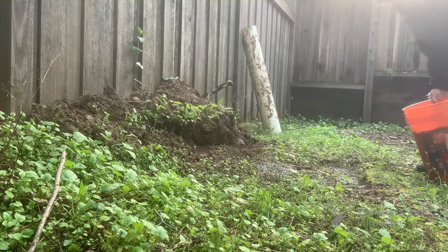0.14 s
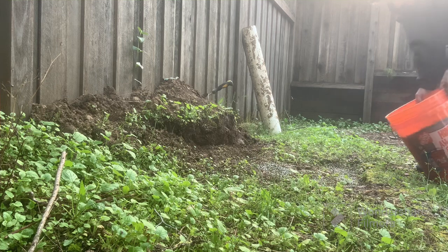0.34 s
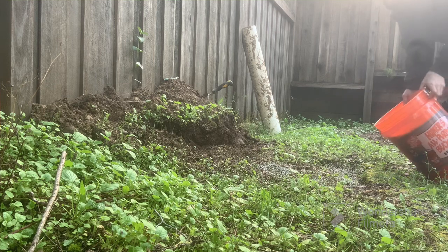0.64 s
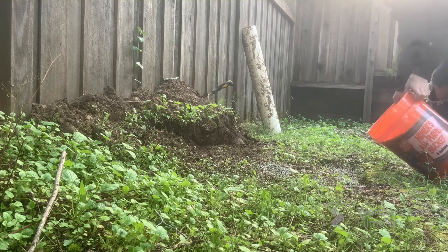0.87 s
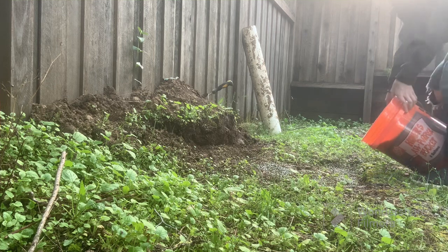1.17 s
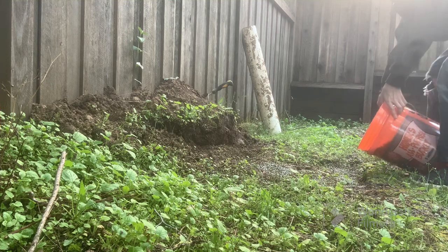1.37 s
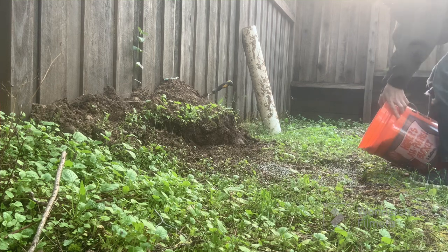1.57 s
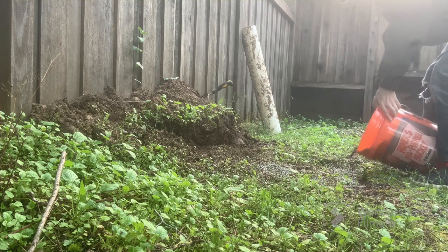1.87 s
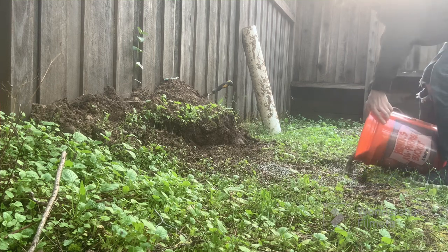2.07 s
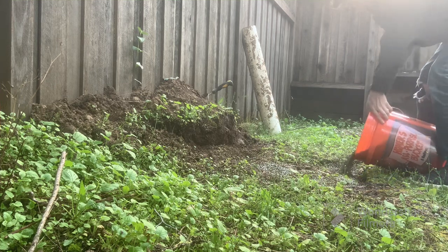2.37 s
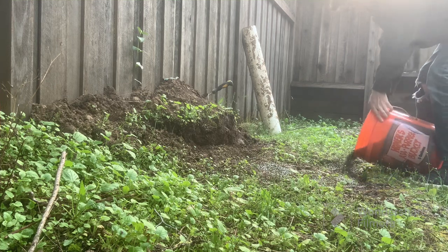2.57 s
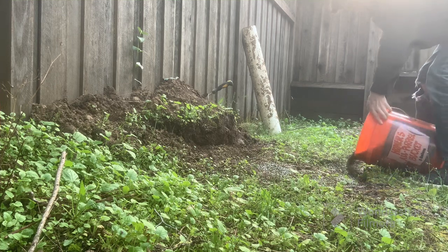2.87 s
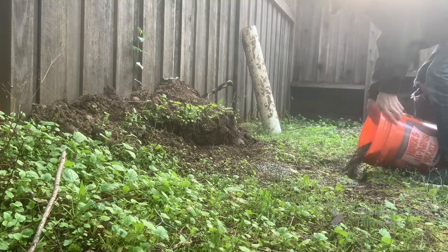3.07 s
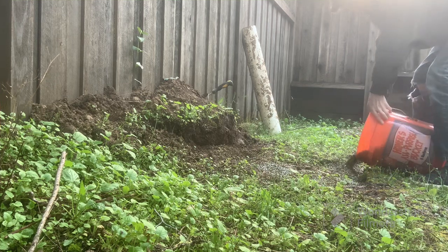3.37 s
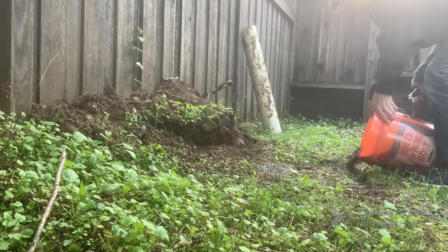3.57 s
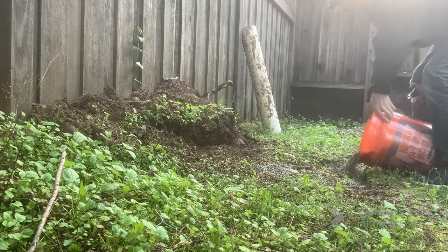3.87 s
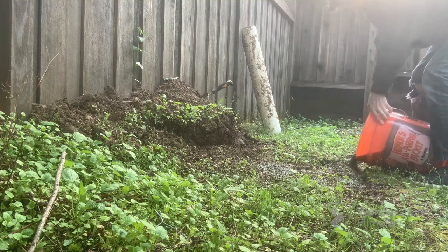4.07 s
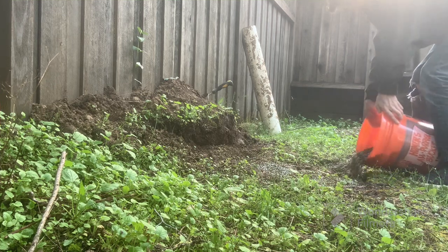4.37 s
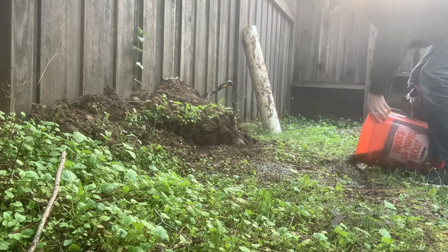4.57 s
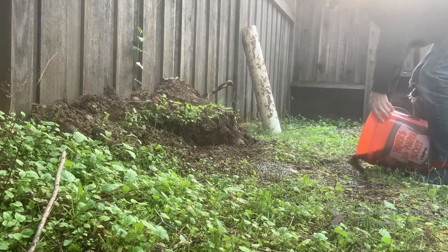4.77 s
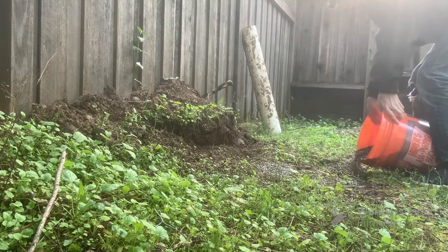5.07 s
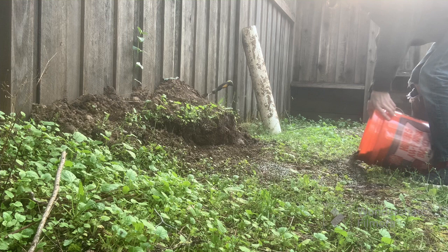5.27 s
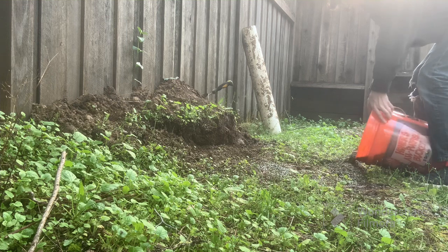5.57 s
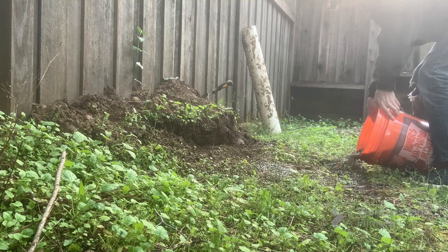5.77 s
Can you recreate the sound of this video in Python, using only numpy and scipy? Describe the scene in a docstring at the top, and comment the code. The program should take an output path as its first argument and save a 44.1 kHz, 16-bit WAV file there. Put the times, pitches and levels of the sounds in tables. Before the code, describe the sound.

Gravel pours from a plastic bucket onto damp soil, heard close and to the right. Dense clacking stones come first, then duller rattles, gritty hiss and scattered ticks as the bucket is shaken out. Low thuds knock the ground, the flow briefly thins, and one last rattling surge fades. A soft machine hum and rumble lie far behind.

```python
"""Gravel slides out of a tipped plastic bucket onto soil in a fenced yard, to the right of a two-port microphone.
Random impacts drum on the bucket wall's resonances, ring the stones and hiss as fine grit on the heap.
Single stones clack and pebbles tick as short struck rings; the bucket thuds on the ground in falling low cycles.
Behind it, shaped noise makes a distant machine's wavering hum, a rumble and low ground swells around the thuds."""
import sys
import numpy as np
from scipy import signal
from scipy.fft import rfft, irfft, next_fast_len
from scipy.io import wavfile

SR = 44100
rng = np.random.default_rng(int(sys.argv[2]) if len(sys.argv) > 2 else 0)


def generate_wav(sig):
    """Save sig (samples, or channels by samples) to the path in sys.argv[1] as 16-bit PCM at SR."""
    pcm = np.round(np.clip(np.atleast_2d(sig).T, -1, 1) * 32767).astype(np.int16)
    wavfile.write(sys.argv[1], SR, pcm)


N = 261777

# distant rumble, balance over frequency: f/Hz, density/dB per Hz
RUMBLE_SPECTRUM = [(20, -37), (45, -15.5), (80, -6), (140, -6), (250, -11.5), (440, -20.5), (1000, -29.5),
                   (3000, -40), (8000, -59), (15000, -62)]
# likeness of the two ports in the distant sound: f/Hz, likeness/0-1
RUMBLE_LIKENESS = [(25, 0.6), (100, 0.88), (200, 0.73), (500, 0.55), (2000, 0)]
# resonances of the machine hum, each passed twice: f/Hz, width of one pass/Hz, relative level/dB
HUM_MODES = [(86.6, 18, -12), (122.8, 14, -5), (173, 25.5, 3), (215, 47, -11.5)]
# how the distance comes and goes: t/s, hum level/dB, rumble level/dB
DISTANT_LEVELS = [(0.0, -44, -46), (0.3, -48.5, -49), (0.6, -50, -47.5), (1.7, -58.5, -53.5),
                  (2.1, -55.5, -50.5), (2.5, -55, -52), (3.1, -55, -53), (3.7, -51, -52), (4.3, -53.5, -52),
                  (4.9, -56.5, -53), (5.5, -55.5, -51), (5.94, -64, -52)]
# low swells of the ground, balance over frequency: f/Hz, density/dB per Hz
SWELL_SPECTRUM = [(15, -39), (45, 11), (75, 6), (140, -51)]
# low rumble swells of the ground, around the thuds: t of the top/s, level/dB
RUMBLE_SWELLS = [(.68, -69), (1.44, -46.5), (1.88, -52), (2.89, -50), (3.2, -47), (3.47, -45.5),
                 (4.78, -43), (5.26, -47)]
SWELL_RISE_DB_PER_S, SWELL_FALL_DB_PER_S = 95, 67

# left port against right for sound from the bucket: f/Hz, level/dB, likeness/0-1
LEFT_PORT = [(0, -13, 1), (626, 0, 0.85), (950, -4.5, 0.73), (1720, -0.5, 1), (2300, -1, 0.52),
             (3070, -1.5, 0.56)]
# the same in the treble: f/Hz, level/dB, likeness/0-1
LEFT_PORT_TREBLE = [(4300, -6, .45), (5600, -9, .35), (6500, -1, .85), (8500, 0, .99), (9500, 0, .88),
                    (13400, 0, .99), (14500, 0, .85), (15900, 0, .9)]
# phase lag of the left port: f/Hz, lag/turns
LEFT_LAG = [(0, 0), (800, .09), (1700, .19), (3000, .22), (4400, .33), (5500, .6), (6400, 1), (8400, 1.5),
            (13400, 2.5), (15800, 3)]

# the bucket knocks the ground: t/s, level before shaping/dB, nominal f before the glide/Hz, length/nominal cycles
GROUND_THUDS = [(1.4283, -25, 190, 2.6), (1.482, -40, 167, 2.7), (1.502, -36, 187, 2.8),
                (1.874, -39, 101, 2.7), (2.883, -55, 110, 2.7), (3.486, -33, 110, 1.3),
                (4.7737, -25.5, 157, 1.34), (4.809, -37, 172, 2), (4.852, -37, 161, 4.3),
                (4.922, -32, 148, 2.5), (5.12, -39, 160, 4.5), (5.219, -33, 104, 2.1),
                (5.243, -35, 106, 1.4)]

# single stones that strike clearly: t/s, peak level/dB, ring f/Hz
STONE_CLACKS = [(0.569, -35, 2130), (0.5823, -26, 2070), (0.6006, -17, 3810), (0.6219, -15, 3230),
                (0.6327, -14, 3140), (0.65, -23, 3680), (0.6632, -21, 2860), (0.6888, -20, 3060),
                (0.706, -16, 2990), (0.7212, -22, 2930), (0.767, -23.5, 2120), (0.804, -28, 3240),
                (0.8373, -36, 3620), (0.8672, -25.5, 1960), (0.89, -22.5, 3560), (0.943, -33, 1980),
                (1.0421, -24, 2300), (1.0614, -21, 2390), (1.0816, -19, 1900), (1.1, -24, 2330),
                (1.1276, -32, 3230), (1.1528, -26, 3040), (1.1647, -32, 1790), (1.179, -29, 3100),
                (1.2077, -33, 1400), (1.2548, -14, 3770), (1.2669, -28, 1690), (1.2798, -31, 1360),
                (1.2973, -33, 2170), (1.3361, -28, 1770), (1.3968, -40, 1210), (1.4364, -40, 1470),
                (1.4832, -30, 1150), (1.514, -26.5, 1980), (1.5305, -28, 1130), (1.547, -23.5, 1230),
                (1.5642, -21, 1980), (1.5826, -32, 1130), (1.6, -41, 1310), (1.6404, -25, 1280),
                (1.6492, -22.5, 1160), (1.66, -31, 2220), (1.6844, -24, 2130), (1.717, -27, 2130),
                (1.7399, -36, 2150), (1.9098, -22.5, 1780), (1.9947, -54, 1260), (2.045, -29.5, 1190),
                (2.0548, -62, 1640), (2.0875, -34, 1760), (2.2361, -39, 1770), (2.2835, -33, 3250),
                (2.413, -36, 1290), (2.4248, -35, 1380), (2.468, -41, 1680), (2.668, -41, 1120),
                (2.73, -39.5, 1210), (2.783, -36, 1730), (2.8052, -37, 1770), (2.9282, -27.5, 1100),
                (2.986, -40, 1400), (3.0905, -28, 1310), (3.252, -36, 1850), (3.3838, -32, 920),
                (3.5135, -30, 1170), (3.5436, -30, 1100), (3.573, -35, 1080), (3.6154, -32, 1230),
                (3.685, -37, 1870), (3.6995, -34, 1180), (3.7264, -24, 3290), (3.75, -28, 1260),
                (3.7636, -30, 1810), (3.7852, -40, 1810), (3.8194, -40, 2020), (3.853, -24.5, 1960),
                (3.8613, -27, 1430), (3.8997, -33, 1660), (4.141, -32, 1230), (4.2228, -32, 1300),
                (4.278, -29, 1260), (4.2899, -25, 1460), (4.3482, -26, 1900), (4.375, -27, 1730),
                (4.3917, -27, 1820), (4.4203, -31, 1890), (4.4784, -24, 1560), (4.5327, -26, 1380),
                (4.6322, -34, 2930), (4.738, -33, 1270), (5.158, -33, 3250), (5.3064, -24, 1170),
                (5.3754, -41, 1540), (5.488, -43, 1130), (5.568, -34, 1200), (5.586, -26.5, 1100),
                (5.655, -28.5, 1420), (5.7158, -31, 1430), (5.7284, -26.5, 1390), (5.827, -39, 1280)]
CLACK_T60_S, CLACK_BLOW, CLACK_CRACK_DB = 0.022, 12, -3
SPRAY_DB, SPRAY_HZ, SPRAY_T60_S = -16, 6500, 0.054  # grit thrown up by each clack
# small pebbles that tick sharply: t/s, peak level/dB, centre f/Hz
PEBBLE_TICKS = [(0.327, -41.5, 10400), (0.5627, -22.5, 4730), (0.5755, -30, 5860), (0.5838, -19, 5230),
                (0.5912, -21, 5140), (0.6015, -25, 5500), (0.6195, -14.5, 4460), (0.6327, -21, 5660),
                (0.6492, -22, 4540), (0.6986, -28, 4600), (0.71, -24, 5400), (0.7357, -23, 4730),
                (0.767, -19, 5660), (0.8657, -34, 4780), (0.8828, -26, 5740), (0.8885, -28, 5400),
                (0.9418, -19.5, 10680), (0.9696, -39, 5730), (1.0414, -23.5, 5100), (1.0622, -30, 5450),
                (1.0816, -23.5, 4750), (1.1001, -22, 5840), (1.1242, -16.5, 4740), (1.151, -31, 5120),
                (1.1596, -21, 6600), (1.2082, -28, 4670), (1.2215, -37, 5680), (1.2447, -20, 9200),
                (1.255, -19, 4660), (1.2668, -24, 6030), (1.2793, -21, 4870), (1.2869, -23, 5960),
                (1.2971, -25, 7080), (1.3303, -27, 9200), (1.3554, -50, 9630), (1.3736, -42, 8600),
                (1.3996, -32, 9840), (1.4054, -30, 5600), (1.4287, -27, 9500), (1.4364, -27.5, 4590),
                (1.4481, -25, 9600), (1.463, -25, 5100), (1.4856, -25, 9520), (1.497, -27, 9750),
                (1.5052, -24, 10200), (1.516, -30, 10030), (1.5256, -33, 9820), (1.5694, -16.5, 9400),
                (1.5829, -40, 5040), (1.5952, -36, 8610), (1.6093, -22, 8400), (1.6403, -23, 5470),
                (1.65, -19, 4750), (1.6824, -31, 5560), (1.693, -25, 8600), (1.802, -31, 10440),
                (1.8206, -24, 8800), (1.8287, -25.5, 5060), (1.8433, -32, 5880), (1.8518, -21, 9900),
                (1.8588, -25, 9280), (1.9073, -22.5, 5300), (1.9507, -25, 9020), (2.0456, -31.5, 4480),
                (2.0549, -29, 4820), (2.1365, -23.5, 8400), (2.1942, -24.5, 6900), (2.2773, -25.5, 8150),
                (2.3197, -31, 9100), (2.441, -31, 9170), (2.5375, -26, 13700), (2.677, -28, 11650),
                (2.8288, -25, 10500), (2.8775, -27, 10300), (2.962, -26, 13300), (3.6739, -26.5, 7400),
                (3.7287, -23, 8800), (3.8194, -29, 8800), (3.897, -22.5, 13570), (4.0576, -24, 11220),
                (4.48, -22.5, 5560), (5.3357, -26, 9700), (5.5691, -29.5, 9390), (5.5848, -29, 10680),
                (5.6136, -31, 8700), (5.728, -28.5, 5240), (5.8257, -32, 7200), (5.8782, -34, 13500)]
TICK_T60_S, TICK_BLOW, TICK_CYCLES = 0.015, 5, 1.96

# steady flow out of the bucket: t/s, wall drumming level in .6-1.6 kHz/dB,
# stone clatter level in 2.2-5 kHz/dB, falling grit level in 9.5-12.5 kHz/dB
STEADY_FLOW = [(0.2, -70, -103, -94), (0.35, -70, -71.5, -78), (0.45, -58, -64.5, -60.5),
               (0.54, -66, -57.5, -54.5), (0.9, -55, -53, -67), (1.4, -51.5, -52.5, -61),
               (1.8, -50, -53, -57), (2.13, -56, -56, -50), (2.4, -71, -75, -49.5), (2.52, -54, -55.5, -45),
               (2.69, -62, -66, -48.5), (2.86, -53.5, -62.5, -47), (3.0, -50.5, -52, -50),
               (3.14, -53, -53, -45.5), (3.27, -53, -59, -48), (3.54, -48, -53.5, -45),
               (3.66, -49, -52.5, -49.5), (3.8, -47.5, -49.5, -47), (4.0, -51.5, -56, -47),
               (4.15, -47, -54, -47.5), (4.3, -48.5, -52.5, -49.5), (4.41, -45.5, -47.5, -44.5),
               (4.46, -47.5, -47.5, -45.5), (4.59, -48, -52.5, -46), (4.68, -44, -51, -45),
               (4.76, -48, -51, -47), (4.84, -53, -58, -50), (4.96, -57.5, -63, -52),
               (5.11, -58.5, -68, -55.5), (5.17, -51.5, -58.5, -53), (5.3, -50.5, -61.5, -49.5),
               (5.49, -42.5, -47.5, -45.5), (5.74, -50.5, -51.5, -52), (5.94, -63.5, -71, -52.5)]
# the load slips while the bucket tips: t of the start/s, build-up/s, dying away/dB per s,
# drumming top level/dB, clatter top level/dB, grit top level/dB
LOAD_SLIPS = [(0.565, 0.075, 138, -42.5, -34, -46.5), (0.68, 0.015, 154, -51, -59, -65),
              (1.051, 0.065, 56, -46.5, -39.5, -67), (1.22, 0.059, 302, -47, -45.5, -51),
              (1.335, 0.0072, 146, -68, -71, -71), (1.539, 0.13, 202, -44, -43, -53),
              (1.869, 0.082, 159, -46.5, -47, -55), (2.184, 0.1, 125, -47.5, -51, -51)]
SLIP_RISE_S, SLIP_START_DB = 0.0024, -6.5  # a slip starts almost at once, this far under its top
TIPPED_S, SETTLE_S, SETTLED_SHARE = 2.3, 0.3, 0.63  # once the bucket lies tipped, the load runs more evenly
# fixed resonances of the bucket wall: f/Hz, width/Hz, relative gain/dB
WALL_MODES = [(636, 790, -12), (814, 97, -4.5), (1100, 104, -3), (1275, 115, -1.5), (2273, 180, -8),
              (2860, 100, -11)]
# one note of the bucket drifts as it tips and empties: t/s, f/Hz, relative gain/dB
HOLLOW_NOTE = [(0, 1760, -3), (0.6, 1850, 2), (1.3, 1920, -13), (1.7, 1810, -1.5), (2.4, 1715, -4.5),
               (3.1, 1790, 0), (3.45, 1700, -6), (3.8, 1830, -2.5), (4.1, 1790, -4.5), (4.35, 1810, -2),
               (4.65, 1810, -6), (5.0, 1720, 0), (5.45, 1780, -6.5), (5.94, 1780, -7)]
HOLLOW_WIDTH_HZ = 207
# tone shaping laid over the ringing stones: f/Hz, relative gain/dB
CLATTER_TONE = [(500, 2.5), (1000, -7.5), (1800, 3.5), (2400, 1.5), (3100, 3), (3500, 2.5), (4100, 0.5),
                (5000, -0.5), (5700, 0), (6600, -5.5), (9500, -8.5), (13500, -8), (16000, -15)]
# tone shaping laid over the ringing grit: f/Hz, relative gain/dB
GRIT_TONE = [(2000, 19), (5000, -4.5), (7000, -5.5), (9500, 7), (12000, 8.5), (14000, 5.5), (16000, 7)]

EDGE_HZ = 15740


def gain_of(db):
    """Turns decibels into an amplitude factor."""
    return 10 ** (np.asarray(db) / 20)


def evened(x):
    """Scales x to rms 1."""
    return x / np.sqrt(np.mean(x ** 2) + 1e-20)


def add(mix, s, sound):
    """Lays a sound into the mix from s seconds on."""
    part = mix[round(s * SR):][:len(sound)]
    part += sound[:len(part)]


def read(points, hz):
    """Reads a table between its points, along log frequency."""
    f, value = np.transpose(points)
    return np.interp(np.log(hz + 1), np.log(f + 1), value)


def filtered(x, response):
    """Applies a response, real or complex, given as a function of frequency."""
    size = next_fast_len(N + 4096)
    hz = np.fft.rfftfreq(size, 1 / SR)
    return irfft(rfft(x, size) * response(hz), size)[..., :N]


def coloured(x, points):
    """Shapes x by the gain curve of a table, at rms 1."""
    return evened(filtered(x, lambda hz: gain_of(read(points, hz))))


def ringing(x, hz, width):
    """One two-pole resonance, dying faster the wider it is."""
    r = np.exp(-np.pi * width / SR)
    return signal.lfilter([1 - r, 0, r - 1], [1, -2 * r * np.cos(2 * np.pi * hz / SR), r * r], x)


def ports(x):
    """The right port hears the bucket directly; the left lags, shaded, and partly by ever-changing paths."""
    f, db, same = np.transpose(LEFT_PORT + LEFT_PORT_TREBLE)
    same = np.clip(same, 0, 1)
    # random phases in every short frame make the ever-changing paths
    frames = signal.stft(x, nperseg=256)[2]
    frames = frames * np.exp(2j * np.pi * rng.random(frames.shape))
    scattered = signal.istft(frames, nperseg=256)[1][:N]
    scattered = np.roll(scattered, 100)  # samples: the longer paths arrive after the direct sound
    scattered *= np.std(x) / np.std(scattered)

    def lagging(hz):
        turns = np.interp(hz, *np.transpose(LEFT_LAG))
        return np.interp(hz, f, same) * np.exp(-2j * np.pi * turns)

    direct = filtered(x, lagging)
    diffuse = filtered(scattered, lambda hz: np.sqrt(1 - np.interp(hz, f, same) ** 2))
    left = filtered(direct + diffuse, lambda hz: gain_of(np.interp(hz, f, db)))
    return np.array([left, x])


def placed(x, lo_hz, hi_hz):
    """Both ports' view of a layer, scaled so that their mean has rms 1 in the band lo-hi."""
    pair = ports(x)
    return pair / np.std(filtered(pair.mean(0), lambda hz: (hz > lo_hz) & (hz < hi_hz)))


def distant_air():
    """Noise at both ports: the left shares the right's noise by likeness, the rest is its own."""
    right, other = rng.standard_normal((2, N))
    left = filtered(right, lambda hz: np.clip(read(RUMBLE_LIKENESS, hz), 0, 1))
    left += filtered(other, lambda hz: np.sqrt(1 - np.clip(read(RUMBLE_LIKENESS, hz), 0, 1) ** 2))
    return np.array([left, right])


def machine_hum(air):
    """Noise passed twice through narrow resonances wavers in level like a distant hum."""
    return evened(sum(gain_of(db) * evened(ringing(ringing(air, hz, width), hz, width))
                      for hz, width, db in HUM_MODES))


def ground_swells(shared):
    """Low noise swelling around the thuds, mostly unlike at the two ports with a fainter shared part."""
    t = np.arange(N) / SR
    swells = [db + np.minimum(SWELL_RISE_DB_PER_S * (t - top), SWELL_FALL_DB_PER_S * (top - t))
              for top, db in RUMBLE_SWELLS]
    noise = rng.standard_normal((2, N)) + 0.49 * shared
    return gain_of(np.max(swells, 0)) * coloured(noise, SWELL_SPECTRUM)


def yard():
    """The background: distant rumble, machine hum and low swells of the ground."""
    air = distant_air()
    s, *levels = np.transpose(DISTANT_LEVELS)
    hum_db, rumble_db = (np.interp(np.arange(N) / SR, s, db) for db in levels)
    rumble = gain_of(rumble_db) * coloured(air, RUMBLE_SPECTRUM)
    return rumble + gain_of(hum_db) * machine_hum(air) + ground_swells(air[1])


def thuds():
    """A short push, then a few low cycles falling quickly in pitch."""
    out = np.zeros(N)
    for s, db, hz, cycles in GROUND_THUDS:
        turns = np.arange(int(SR * 3 * cycles / hz)) * hz / SR
        shape = np.minimum(turns / 0.81, 1) * np.exp(-1.6 * (turns / cycles / 2.7) ** 1.65)
        falling = np.sin(2 * np.pi * np.log(1 + 0.46 * turns) / 0.503)
        add(out, s, gain_of(db) * shape * falling)
    return filtered(out, lambda hz: hz ** 2 / (hz ** 2 + 34.0 ** 2))  # thins the deepest bass


def strike(db, hz, t60, cycles, blow):
    """A blow, then a dying chatter, ringing at the stone's own pitch; blow 0 leaves only the chatter."""
    t = np.arange(1500) / SR
    chatter = rng.standard_normal(len(t)) * gain_of(-60 * t / max(t60, .001))
    ring = ringing(ringing(chatter + blow * (t == 0), hz, hz / cycles), hz, hz)
    return gain_of(db) * ring / abs(ring).max()


def clacks():
    """The single stones, each a ring, a wide crack and a spray of grit, and the pebbles."""
    out = np.zeros(N)
    for s, db, hz in STONE_CLACKS:
        add(out, s, strike(db, hz, CLACK_T60_S, 2.06, CLACK_BLOW))
        add(out, s, strike(db + CLACK_CRACK_DB, 1.77 * hz, CLACK_T60_S, 0.85, 18.0))
        add(out, s, strike(db + SPRAY_DB, SPRAY_HZ, SPRAY_T60_S, 0.27, 0))
    for s, db, hz in PEBBLE_TICKS:
        add(out, s, strike(db, hz, TICK_T60_S, TICK_CYCLES, TICK_BLOW))
    return out


def flows():
    """Gain of each kind of impact: the steady flow, and on it the slips that build up and die away."""
    t = np.arange(N) / SR
    s, *levels = np.transpose(STEADY_FLOW)
    power = np.array([gain_of(np.interp(t, s, db, left=-100)) ** 2 for db in levels])
    for start, build, fall_db, *tops in LOAD_SLIPS:
        u = t - start
        shape_db = np.minimum(SLIP_START_DB * (1 - u / build), -fall_db * (u - build))
        onset = np.clip(u / SLIP_RISE_S, 0, 1)
        power += (onset * gain_of(shape_db + np.array(tops)[:, None])) ** 2
    return np.sqrt(power)


def clumped(clump_s):
    """How thickly the load comes: clumps that start at once and thin out."""
    starts = rng.exponential(1, N) * (rng.random(N) < 1.0 / (clump_s * SR))
    return np.minimum(signal.lfilter([1], [1, -np.exp(-1 / (clump_s * SR))], starts), 4)


def impacts(per_s, spread_db, clumps_db):
    """Random impulses, mostly small and a few large, louder in the clumps."""
    size = gain_of(spread_db * np.minimum(rng.exponential(1, N), 5)) * rng.choice([-1., 1.], N)
    return size * (rng.random(N) < per_s / SR) * gain_of(clumps_db)


def drifting(x, hz, width):
    """A steep resonance that follows the curve hz: shift down to zero, low-pass twice, shift back."""
    turn, r = np.exp(2j * np.pi * np.cumsum(hz) / SR), np.exp(-np.pi * width / SR)
    low = signal.lfilter([1 - r], [1, -r], x / turn)
    low = signal.lfilter([1 - r], [1, -r], low)
    return 2 * (turn * low).real


def bucket_wall(blows):
    """Each blow lands where one mode of the wall moves most: a fixed one or the drifting hollow note."""
    patch = rng.integers(0, len(WALL_MODES) + 1, N)
    wall = sum(gain_of(db) * ringing(blows * (patch == k), hz, width)
               for k, (hz, width, db) in enumerate(WALL_MODES))
    s, *note = np.transpose(HOLLOW_NOTE)
    hollow_hz, hollow_db = (np.interp(np.arange(N) / SR, s, column) for column in note)
    hollow = drifting(blows * (patch == len(WALL_MODES)), hollow_hz, HOLLOW_WIDTH_HZ)
    return wall + gain_of(hollow_db) * hollow


def chips(hits, lo_hz, hi_hz, cycles, count):
    """Each impact rings one stone: small stones ring high and briefly."""
    which, out = rng.integers(0, count, N), np.zeros(N)
    for k, hz in enumerate(np.geomspace(lo_hz, min(hi_hz, 18000), count)):
        out += evened(ringing(hits * (which == k), hz, hz / cycles)) * np.sqrt(hz)
    return out


def pour():
    """The gravel: wall blows, stones and grit, each following its own flow."""
    drumming, clatter, hiss = flows()
    clumps = clumped(clump_s=0.012)  # shared by all three
    clumps = clumps * np.interp(np.arange(N) / SR, [TIPPED_S, TIPPED_S + SETTLE_S], [1, SETTLED_SHARE])
    wall = bucket_wall(impacts(per_s=2000, spread_db=0.3, clumps_db=1.0 * clumps))
    stone_hits = impacts(per_s=3800, spread_db=0.7, clumps_db=2.1 * clumps)
    stones = chips(stone_hits, 706, 14600, cycles=4.9, count=36)
    grit_hits = impacts(per_s=12000, spread_db=2.0, clumps_db=0.94 * clumps)
    grit = chips(grit_hits, 4330, 19800, cycles=8.9, count=12)
    wall = drumming * placed(wall, 600, 1600)
    stones = clatter * placed(coloured(stones, CLATTER_TONE), 2200, 5000)
    grit = hiss * placed(coloured(grit, GRIT_TONE), 9500, 12500)
    return wall + stones + grit


def scene():
    """Mixes background, thuds (a touch stronger on the right), single stones and the pour."""
    thud_pair = thuds() * gain_of([[-.5], [.5]])
    return yard() + thud_pair + ports(clacks()) + pour()


def record(dry):
    """The band limit: a steep low-pass closes off the top of the treble."""
    low_pass = signal.firwin(1023, EDGE_HZ, window=("kaiser", 9), fs=SR)
    return signal.oaconvolve(dry, low_pass[None], "same")


dry = scene()
out = record(dry)
generate_wav(out)
```